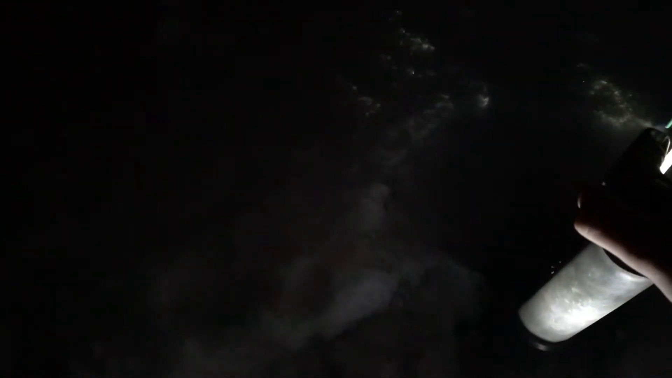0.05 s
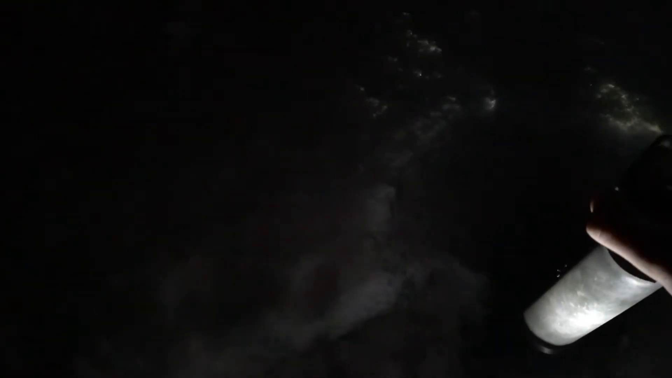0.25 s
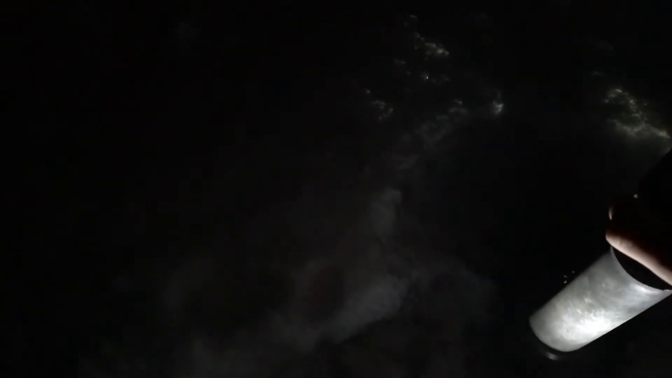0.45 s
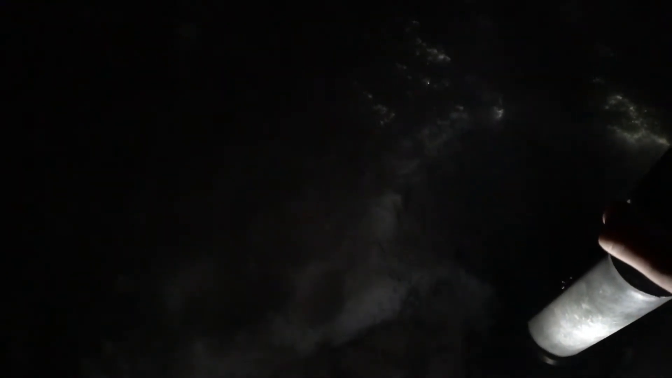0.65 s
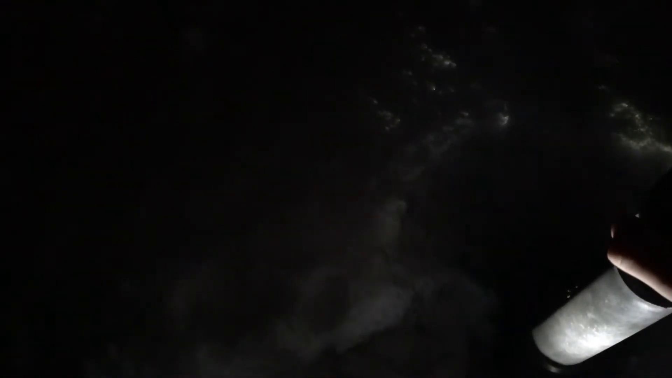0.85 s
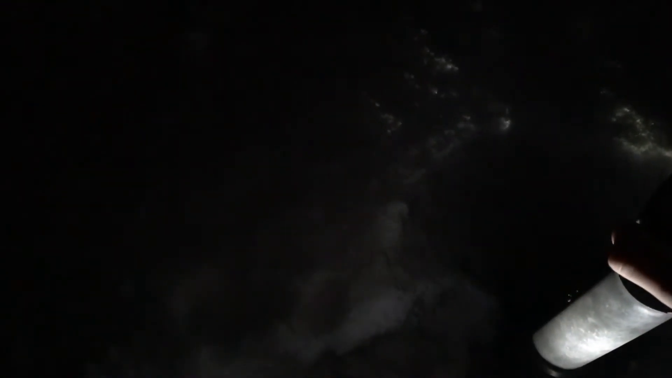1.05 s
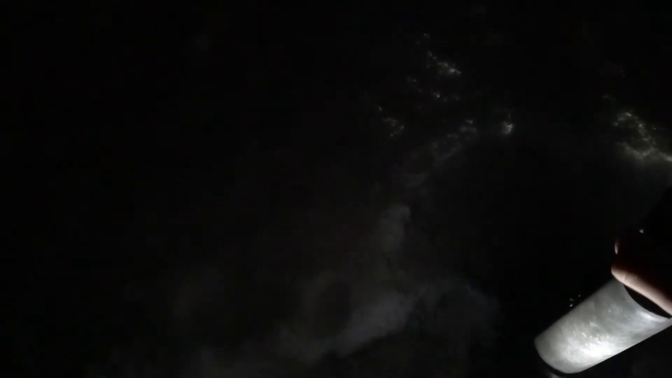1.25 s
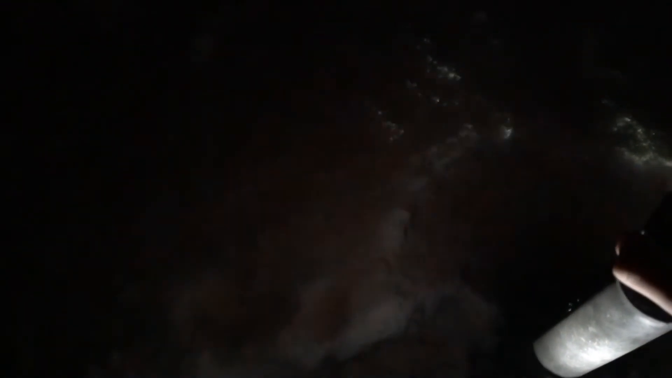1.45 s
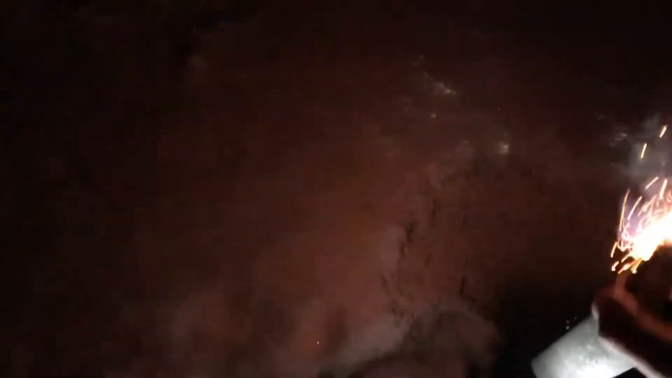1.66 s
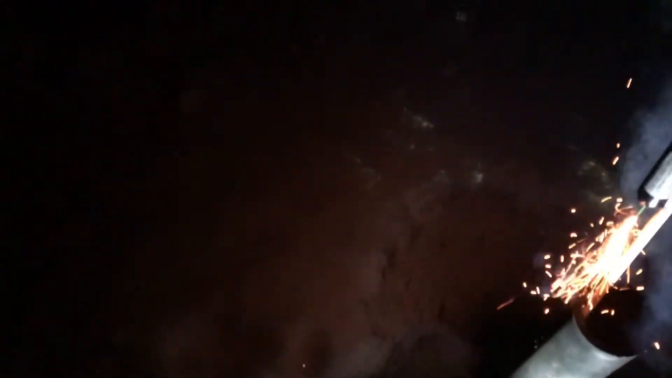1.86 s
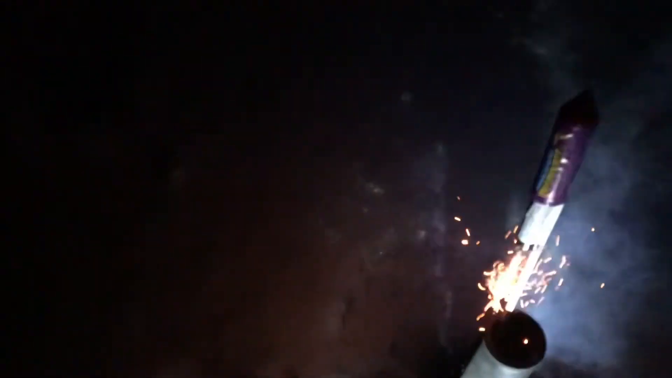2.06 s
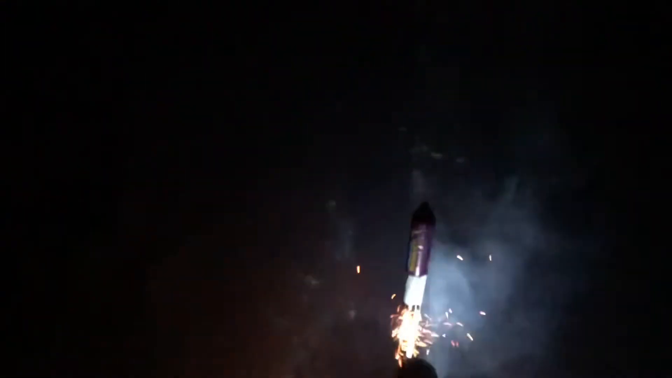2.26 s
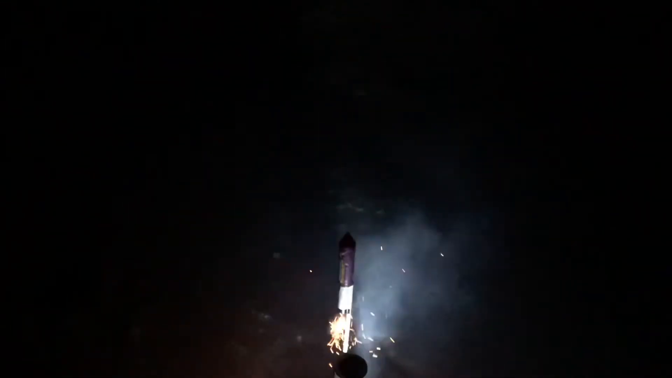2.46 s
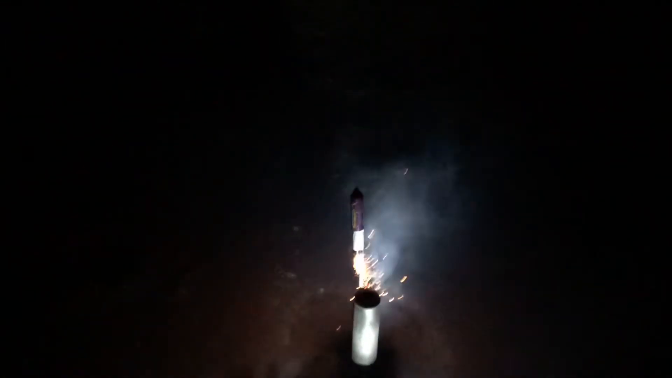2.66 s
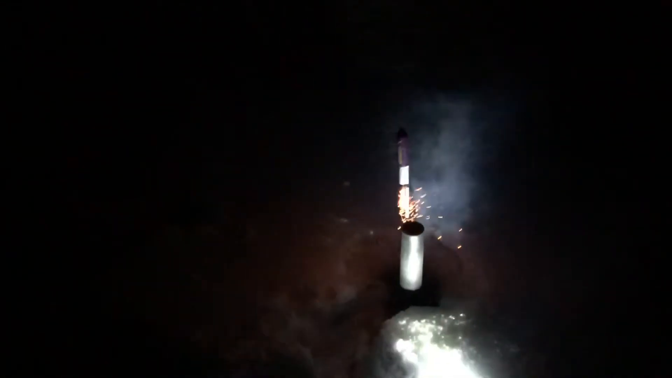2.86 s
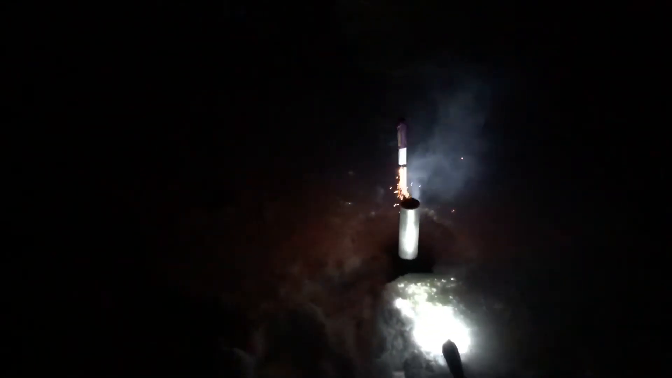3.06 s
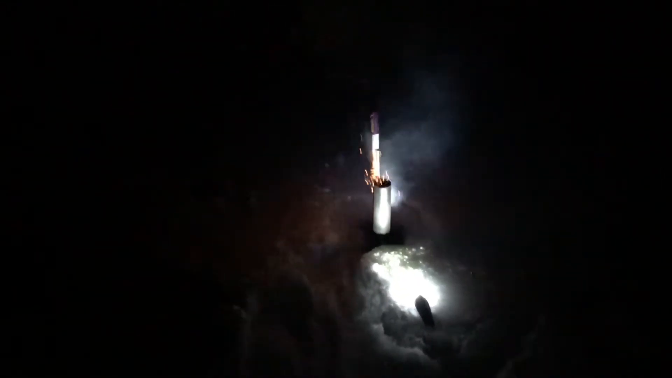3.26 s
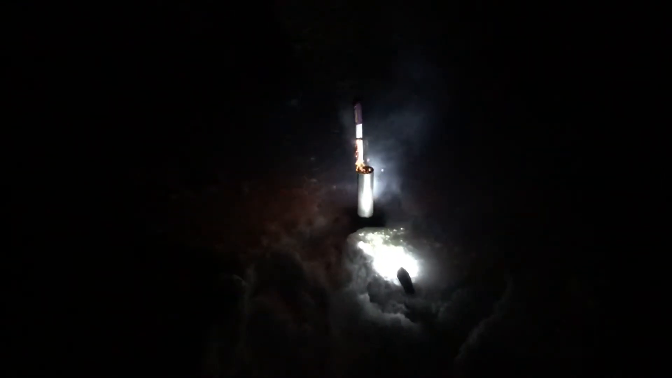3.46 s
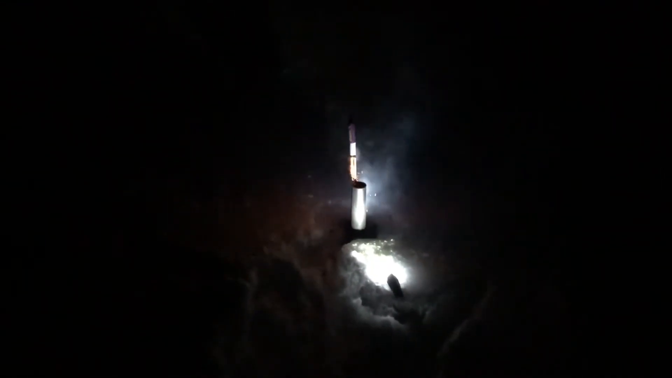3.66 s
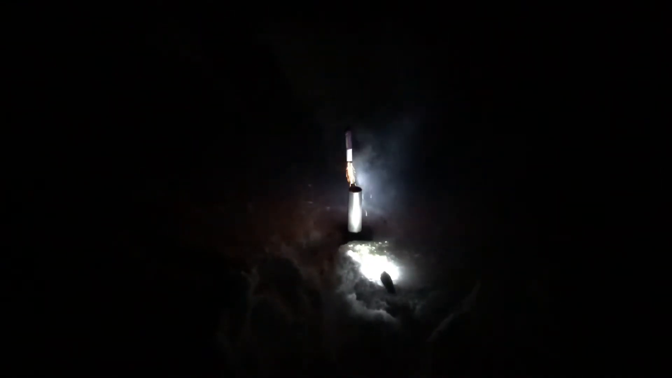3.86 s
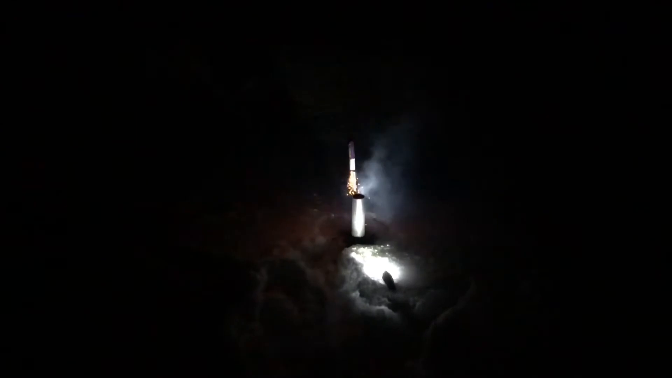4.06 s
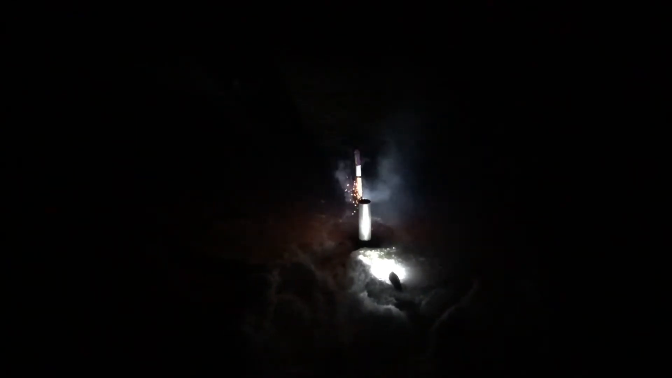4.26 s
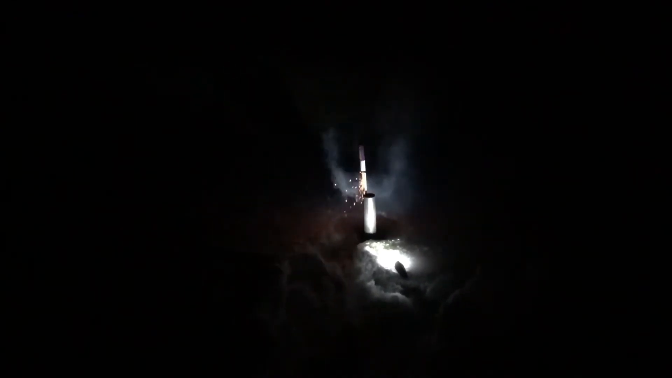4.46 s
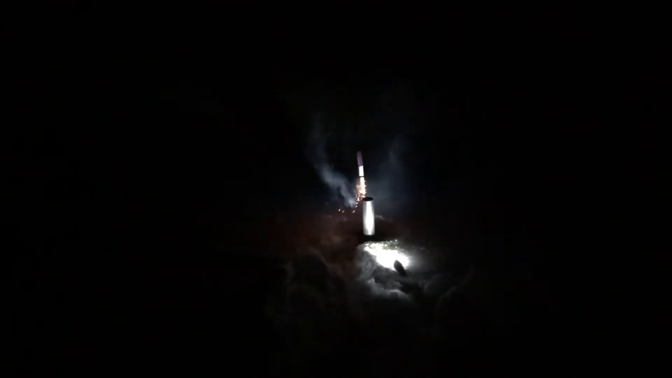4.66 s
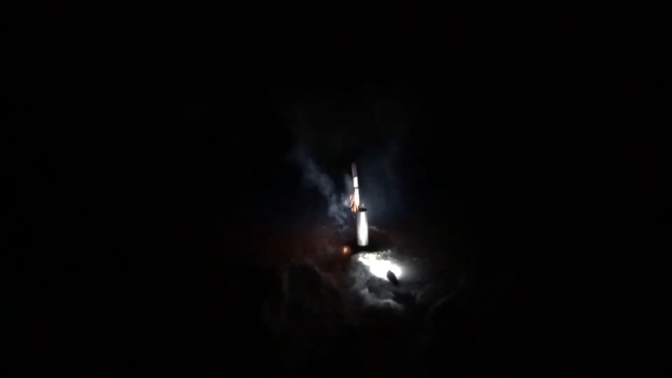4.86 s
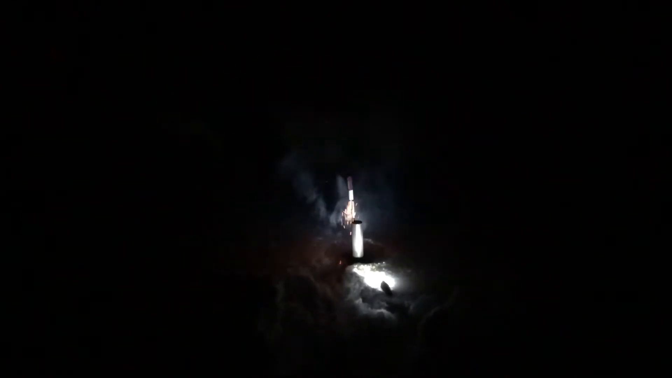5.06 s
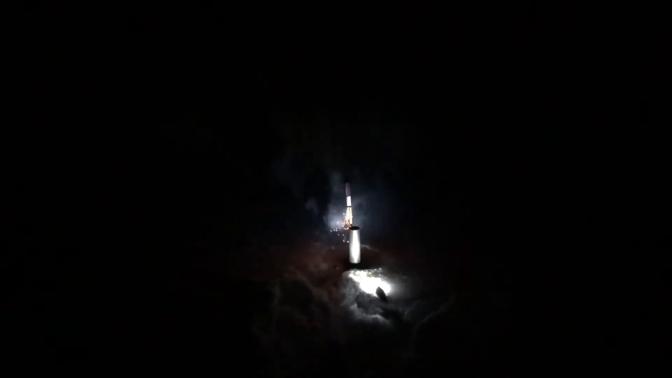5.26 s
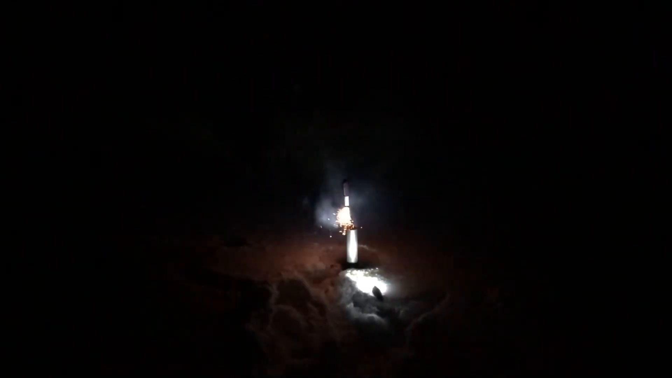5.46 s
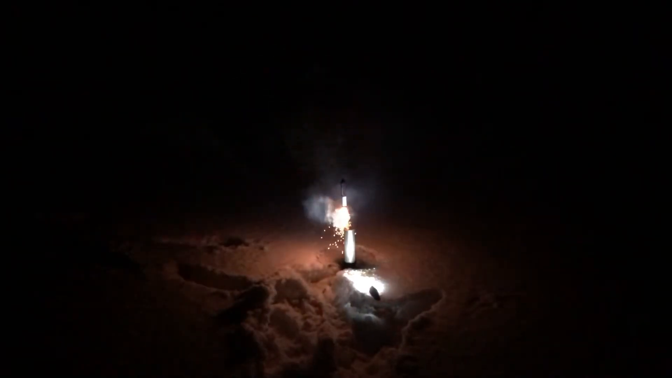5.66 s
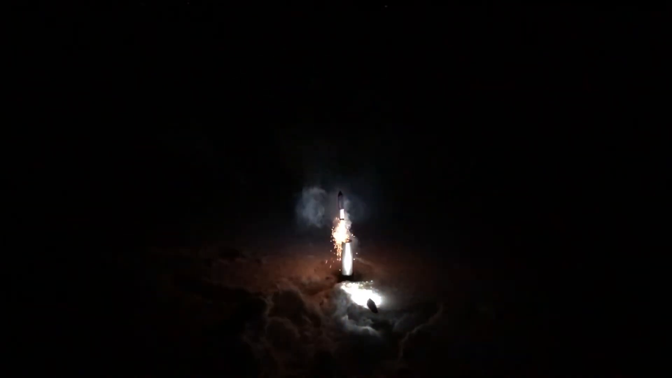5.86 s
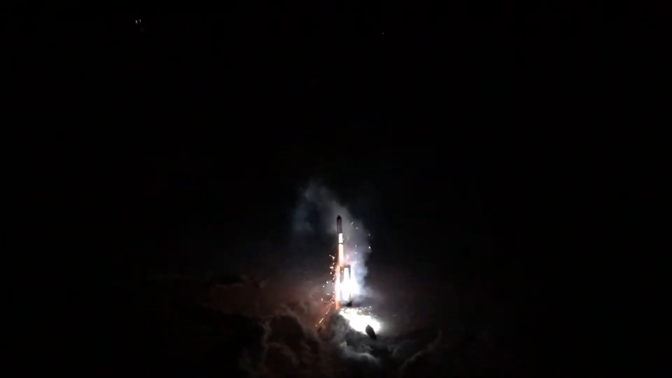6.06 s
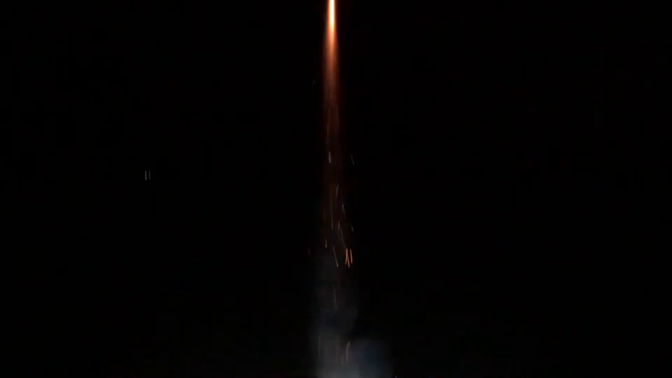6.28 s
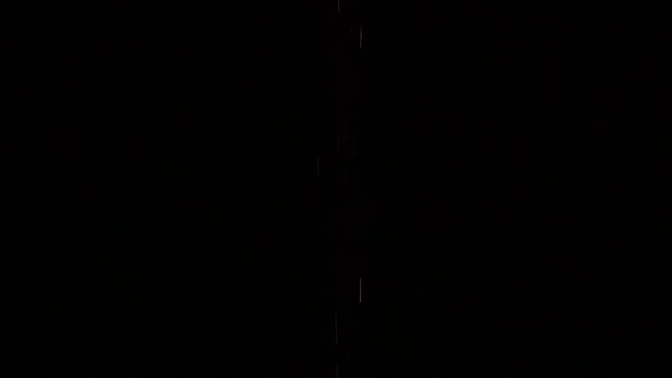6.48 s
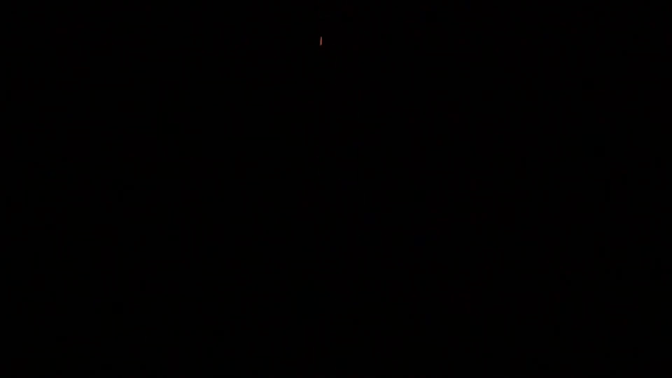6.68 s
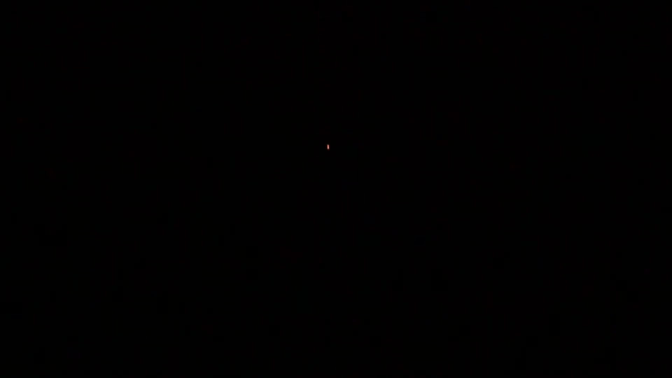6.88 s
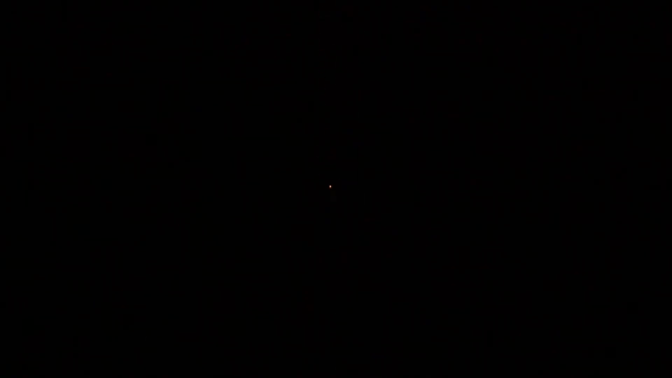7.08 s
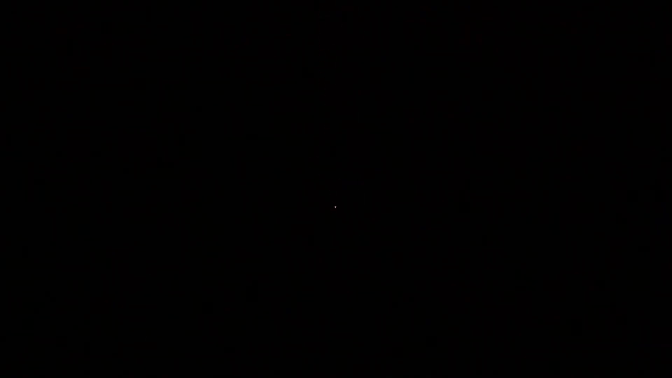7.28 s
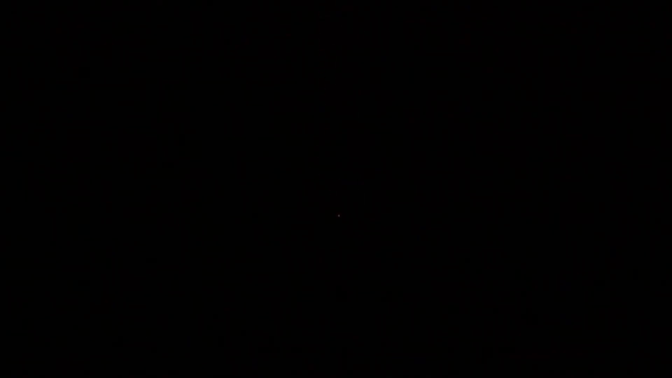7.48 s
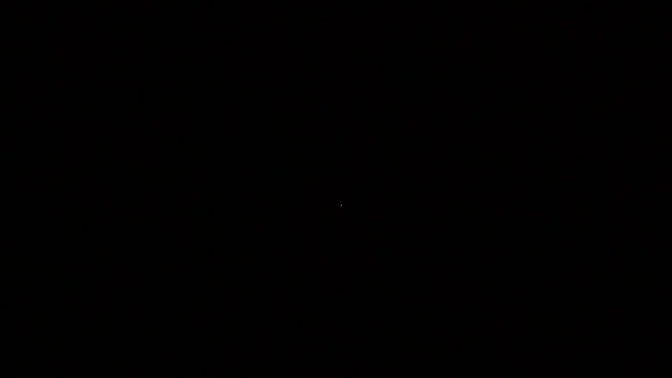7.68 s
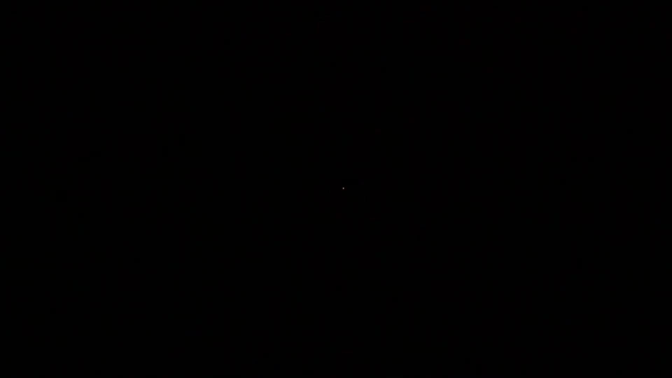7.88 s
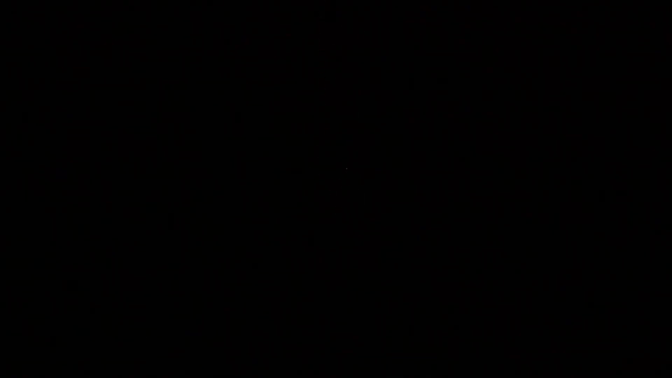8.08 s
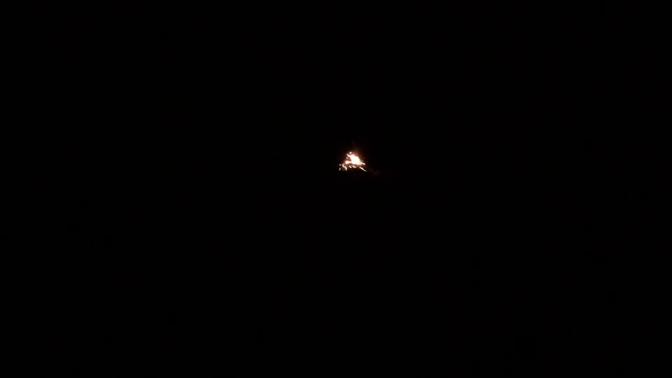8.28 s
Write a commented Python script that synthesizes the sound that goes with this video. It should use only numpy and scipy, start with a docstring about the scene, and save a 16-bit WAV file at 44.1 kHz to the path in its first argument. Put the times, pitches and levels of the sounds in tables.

```python
"""Rocket launch on a breezy night

A rocket's fuse is lit: its burning powder makes a hiss and a flame burr of coloured noise, fading with distance.
The hiss has a resonance that sinks as the rocket settles in its launch tube, then climbs as the fuse burns.
The motor swells as three bands of jet noise with two wavering tube notes, and its exhaust hits the microphone.
A dull far wash follows, then a dry burst of short shocks and ringing thumps, with a fainter echo.
Beneath lie night air, a low drone, breeze and gusts; short clicks, pops of powder and a knock stand out."""
import sys
import numpy as np
from scipy import signal
from scipy.fft import rfft, irfft, next_fast_len
from scipy.io import wavfile

SR = 44100
rng = np.random.default_rng(int(sys.argv[2]) if len(sys.argv) > 2 else 0)


def dump_mix(stems):
    """Bounce the given channels to the path in sys.argv[1] as a 16-bit WAV at rate SR."""
    frames = np.atleast_2d(stems).T  # one column per channel
    limited = np.clip(frames, -1, 1)  # hard clip at full scale
    pcm = np.round(limited * 32767).astype(np.int16)
    wavfile.write(sys.argv[1], SR, pcm)


N = 367353
TIME = np.arange(N) / SR

# frequencies [Hz] and times [s] of the short-time spectrum that colours noise
FRAME = 1024
FRAME_HZ, FRAME_S, _ = signal.stft(np.zeros(N), SR, nperseg=FRAME)
FRAME_HZ = np.maximum(FRAME_HZ, 1)[:, None]

# bands in which noise levels are set [Hz]
LOW_BAND, MID_BAND, RUSH_BAND = (40, 450), (550, 2200), (2500, 6500)
TOP_BAND, FAR_BAND = (7800, 15500), (3000, 15000)

# puffs of wind on the microphone, and the rocket's exhaust blast at 6.29 s:
# (time [s], level before trim [dB], relative length [s], eddy frequency before pacing [Hz])
GUSTS = [(0.535, -43.5, 0.019, 91), (0.649, -41, 0.041, 169.7), (0.658, -35, 0.05, 78),
         (1.177, -51.5, 0.12, 65), (1.68, -40, 0.0078, 253), (1.706, -45, 0.013, 262),
         (1.821, -37.5, 0.012, 237), (2.004, -33, 0.012, 310), (2.119, -43.5, 0.021, 123),
         (2.642, -34.5, 0.044, 120.2), (2.805, -37.5, 0.043, 82.9), (2.93, -34.5, 0.073, 135),
         (3.235, -39, 0.082, 130), (3.377, -42.5, 0.017, 113.3), (3.598, -40, 0.02, 162.7),
         (3.724, -46, 0.023, 77), (3.83, -44.5, 0.017, 139), (3.892, -41, 0.031, 106),
         (4.022, -46.5, 0.033, 69.9), (4.125, -43.5, 0.02, 101), (4.75, -46, 0.021, 160),
         (5.018, -45.5, 0.032, 135), (5.102, -43.5, 0.015, 160), (5.206, -47.5, 0.022, 170),
         (5.391, -41.5, 0.023, 85), (6.286, -14.5, 0.026, 210), (6.296, -26, 0.038, 62),
         (6.692, -46, 0.055, 171), (6.755, -39.5, 0.012, 95.2), (6.889, -41, 0.02, 148.3),
         (7.036, -45.5, 0.027, 82), (7.392, -47.5, 0.038, 109), (7.879, -47, 0.02, 99),
         (7.956, -44.5, 0.047, 120.4)]

# the fuse catches, flares, and at last the flame slips into the nozzle
CATCH_S, FLARE_S, NOZZLE_S = 1.424, 1.49, 5.62
# the rocket passes the microphone; afterwards the low background dips briefly
PASS_S = 6.29
LULL_S, LULL_DB, LULL_WIDTH_S = 6.54, -23, 0.07


def from_db(db):
    """Level is logarithmic: decibels to amplitude gain."""
    return 10 ** (np.asarray(db) / 20)


def rms_one(x):
    """Mean power sets the level: scale to unit rms."""
    return x / np.sqrt(np.mean(x ** 2) + 1e-20)


def in_time(rows, at=TIME):
    """Linear interpolation: each column of a curve table, joined by straight lines."""
    s, *columns = np.transpose(rows)
    return [np.interp(at, s, c) for c in columns]


def at_hz(points, hz=FRAME_HZ):
    """Logarithmic pitch scale: a spectrum in dB, interpolated over log frequency."""
    knots, db = np.transpose(points)
    return np.interp(np.log(hz), np.log(knots), db)


def during(start, end, fade):
    """Gating: one between two times, with linear ramps outside them."""
    return np.clip(np.minimum(TIME - start, end - TIME) / fade + 1, 0, 1)


def ramp(start, end, at=TIME):
    """Linear growth: nearly zero before the start, one after the end."""
    return np.clip((at - start) / max(end - start, 1e-3), 1e-4, 1)


def bell(centre, width, at=TIME):
    """Gaussian swell in time, one at its centre."""
    return np.exp(-.5 * ((at - centre) / width) ** 2)


def hump(hz, octaves):
    """Gaussian resonance on the log-frequency axis, one at its centre."""
    return np.exp(-.5 * (np.log2(FRAME_HZ / hz) / octaves) ** 2)


def drift(rate):
    """Slow random modulation of unit rms, changing about rate times a second."""
    knots = rng.standard_normal(N // 16)
    return rms_one(np.interp(TIME * 2 * rate, np.arange(len(knots)), knots))


def reflection_db(lag_ms, share):
    """Interference: the comb colour of a sound joined by its own delayed reflection."""
    delayed = np.exp(-2j * np.pi * FRAME_HZ * lag_ms / 1000)
    return 20 * np.log10(abs(1 + np.clip(share, 0, .9) * delayed))


def phasing_db():
    """Interference: weak reflections slide as source and listener move by tube and rough ground."""
    slide = 1 + .04 * np.interp(FRAME_S, TIME, drift(1))
    lags_ms = rng.uniform(.9, 3.5, size=4)
    return sum(reflection_db(lag_ms * slide, .075) for lag_ms in lags_ms)


def turbulence(colour_db, band):
    """Turbulent noise of a fixed or moving colour, with unit rms expected inside the band (Hz)."""
    gain = from_db(colour_db)
    inside = (FRAME_HZ > band[0]) & (FRAME_HZ < band[1])
    gain = gain / np.sqrt(np.mean(gain ** 2 * inside, axis=0))
    white = signal.stft(rng.standard_normal(N), nperseg=FRAME)[2]
    return signal.istft(white * gain)[1][:N]


def lowpass(x, hz, order=1):
    """Low-pass filtering (Butterworth): the treble is weakened above a corner frequency."""
    return signal.sosfilt(signal.butter(order, hz, fs=SR, output="sos"), x)


def clicks_at(times, db):
    """Impulse excitation: single-sample pushes of given sizes."""
    out = np.zeros(N)
    out[np.round(np.asarray(times) * SR).astype(int)] = from_db(db)
    return out


def dying(clicks, t60):
    """Exponential decay: an envelope falling 60 dB in t60 seconds after each click."""
    return signal.lfilter([1], [1, -from_db(-60 / (t60 * SR))], clicks + 1e-18)


def ring(clicks, hz, t60):
    """Damped resonance: a click sets a decaying sine ringing."""
    r, w = from_db(-60 / (t60 * SR)), 2 * np.pi * hz / SR
    return signal.lfilter([0, np.sin(w)], [1, -2 * r * np.cos(w), r * r], clicks + 1e-18)


def night():
    """Broadband ambience: steady open air and a low drone like far traffic."""
    # colour of the open air: (frequency [Hz], relative level [dB])
    air_colour = [(15, -30), (40, 2.5), (65, -5), (85, -10), (115, -16), (220, -21), (310, -13.5),
                  (450, -21.5), (850, -19.5), (1100, -27), (1700, -36.5), (4000, -40.5), (15500, -47)]
    # colour of the drone: (frequency [Hz], relative level [dB])
    drone_colour = [(70, -27), (150, 0.5), (225, 2), (290, -4), (345, -0.5), (440, -13), (700, -23.5),
                    (2000, -66)]
    # level of the drone outside the lull: (time [s], level [dB])
    drone_level = [(0, -67.5), (2.25, -76), (2.55, -58), (5.1, -57.5), (5.8, -62), (7.3, -58.5),
                   (8.33, -59)]
    air = from_db(-69.5) * turbulence(at_hz(air_colour), MID_BAND)
    drone_db = in_time(drone_level)[0] + LULL_DB * bell(LULL_S, LULL_WIDTH_S)
    return air + from_db(drone_db) * turbulence(at_hz(drone_colour), LOW_BAND)


def breeze(breeze_db=-69, stirred_db=-61.5, stirred_s=0.1, lumps_db=5.5):
    """Flow noise by turbulent pressure: lumpy throughout, and stirred around each puff or blast."""
    # (frequency [Hz], relative level [dB])
    breeze_colour = [(15, -31.5), (40, 0), (65, 1.5), (120, -7.5), (220, -7.5), (340, -12), (500, -30),
                     (1000, -46), (3000, -78.5)]
    stirred = sum(bell(s, stirred_s) for s, *_ in GUSTS)
    strength = np.sqrt(from_db(breeze_db) ** 2 + from_db(stirred_db) ** 2 * stirred)   # powers add
    unsteady_db = lumps_db * drift(10) + LULL_DB * bell(LULL_S, LULL_WIDTH_S)
    return strength * from_db(unsteady_db) * turbulence(at_hz(breeze_colour), LOW_BAND)


def gusts_and_blast(level_db=-2.3, width=0.47, spread=.45, big_eddy_db=-8, small_eddy_db=-13):
    """Eddy convection: in wind puffs and the exhaust blast, uneven eddies of three sizes pass the port."""
    out = np.zeros(N)
    pace = np.exp(np.clip(spread, 0, 1) * drift(200))
    travel = np.cumsum(pace / pace.mean()) / SR
    for (s, db, length, hz), start in zip(GUSTS, rng.random(len(GUSTS))):
        near = slice(max(int((s - .2) * SR), 0), int((s + .2) * SR))
        swell = bell(s, width * length, TIME[near])
        phase = 2 * np.pi * (hz * travel[near] + start)
        eddies = np.sin(phase)
        eddies += from_db(big_eddy_db) * np.sin(0.35 * phase)
        eddies += from_db(small_eddy_db) * np.sin(2.15 * phase)
        out[near] += from_db(db + level_db) * swell * np.sqrt(2) * eddies
    return lowpass(out * from_db(2 * drift(99)), 494, order=4)


def exhaust_wash(peak_db=-27.5, rise_db_per_s=170.5, fall_db_per_s=196):
    """Flow noise: the exhaust buffets the microphone as the rocket passes."""
    # (frequency [Hz], relative level [dB])
    wash_colour = [(15, -21.5), (45, -9), (70, -3.5), (110, -5.5), (200, 0.5), (300, -3.5), (520, 7.5),
                   (700, -10.5), (1500, -41)]
    below_peak_db = np.maximum(rise_db_per_s * (PASS_S - TIME), fall_db_per_s * (TIME - PASS_S))
    return from_db(peak_db - below_peak_db) * turbulence(at_hz(wash_colour), LOW_BAND)


def click_and_knock():
    """Modal ringing: the sharp click of a powder spit, then a knock, excite damped modes."""
    # the spit's click at 1.69 s, then the knock at 2.51 s: (time [s], push [dB])
    impulses = [(1.6914, -24.5), (2.5101, -27.5), (2.515, -37)]
    # their ring: (frequency [Hz], level relative to the push [dB], decay by 60 dB [s])
    modes = [(336, -8, 0.048), (920, -12, .015), (1500, -11, .012), (3300, -10, 0.0057), (7000, -14, .003)]
    pushes = clicks_at(*np.transpose(impulses))
    return sum(from_db(db) * ring(pushes, hz, t60) for hz, db, t60 in modes)


def clicks_and_pops(level_db=-6, bright_hz=7000):
    """Impulsive noise: short noisy clicks before the fuse catches, then pops of powder, decay quickly."""
    # (time [s], level before trim [dB], decay by 60 dB [s])
    pops = [(.3188, -63, .01), (.59, -62, .03), (0.7232, -56, .02), (.7503, -60, .02), (1.4227, -46, 0.012),
            (1.4397, -44, .02), (1.69, -19, 0.0082), (1.78, -36, .01), (2.507, -40, 0.022),
            (4.3214, -47, .006)]
    crackle = rms_one(np.tanh(lowpass(rng.standard_normal(N), bright_hz) * 2))
    return from_db(level_db) * crackle * sum(dying(clicks_at(s, db), t60) for s, db, t60 in pops)


def sparks(per_s=140, size_db=-7, spread_db=2.0, t60=0.0063):
    """Random (Poisson-like) arrivals: tiny grains briefly lift the hiss; mean power one."""
    sizes = from_db(size_db + spread_db * np.minimum(rng.exponential(1, N), 4))
    return rms_one(1 + dying(sizes * (rng.random(N) < per_s / SR), t60))


def fuse_levels():
    """Distance law: gains of hiss and flame as the fuse catches, flares, surges and is left behind."""
    # surges and falters of the burning fuse; the last is the motor's ignition puff:
    # (time [s], hiss change [dB], flame change [dB], bell width [s])
    surges = [(1.985, -3, 0.5, 0.018), (2.153, -1.5, -2, 0.021), (4.93, 1, 4.5, 0.12),
              (5.207, -2.5, -1, 0.22), (5.543, -3, 5.5, 0.093), (5.894, -4, 6, 0.028)]
    retreat_s, start_m, retreat_m_per_s = 2.035, 0.29, 0.9
    doublings = np.log2(1 + retreat_m_per_s * np.maximum(TIME - retreat_s, 0) / start_m)
    # the flame's burr fades less per doubling of distance than the beamed hiss
    hiss_db = -38.5 - 7 * doublings
    flame_db = -49 - 3.5 * doublings
    flame_db -= 2.5 * ramp(NOZZLE_S, NOZZLE_S + .03)   # muffled in the nozzle
    for s, hiss_surge_db, flame_surge_db, width in surges:
        swell = bell(s, width)
        hiss_db = hiss_db + hiss_surge_db * swell
        flame_db = flame_db + flame_surge_db * swell
    # a short fizz at the catch, falling at 107 dB per second
    catch = from_db(-58 - 107 * np.maximum(TIME - CATCH_S, 0))
    hiss_rise_s, flame_rise_s, flare_power = 0.33, 0.15, 1.25
    hiss = ramp(FLARE_S, FLARE_S + hiss_rise_s) ** flare_power * from_db(hiss_db)
    flame = ramp(FLARE_S, FLARE_S + flame_rise_s) ** flare_power * from_db(flame_db)
    return hiss + catch, flame + from_db(-4) * catch


def sleeve_depths():
    """Resonator coupling: dB of the sleeve's peak and of the dips above and below, as the flame moves in."""
    enter_s, deep_s = 3.85, 5.05
    mouth_s, mouth_width_s, dip_full_s = 3.2, 0.42, 3.74
    depth = ramp(enter_s, deep_s, FRAME_S)
    muffled = ramp(NOZZLE_S, NOZZLE_S + 0.026, FRAME_S)
    open_lift_db, deep_lift_db = 2.5, 13
    lift_db = open_lift_db + (deep_lift_db - open_lift_db) * depth - 2.5 * muffled
    dip_db = 8.5 * ramp(mouth_s, dip_full_s, FRAME_S) * (1 - muffled)
    # a notch while the flame nears the mouth, then a slight lift when it is deep
    under_db = 15 * bell(mouth_s, mouth_width_s, FRAME_S) - 3 * depth * (1 - muffled)
    return lift_db, dip_db, under_db


def fuse(flutter_db=1.13, sputter_db=0.55, heave_db=0.5, ring_octaves=0.42, dip_ratio=1.92,
         dip_octaves=0.29, under_ratio=0.77, under_octaves=0.11, crest_db=1.5, crest_octaves=0.061):
    """Air-column resonance: unevenly burning powder hisses through a sleeve, over the flame's burr."""
    # resonance, sinking as the rocket settles in the tube, then climbing as the fuse burns:
    # (time [s], resonance [Hz])
    sleeve_pitch = [(1.42, 3440), (2.2, 3370), (2.45, 2880), (3.35, 2980), (4.5, 3950), (5.38, 4420),
                    (5.44, 5270), (5.86, 5399)]
    # reflections in and around the sleeve: (lag [periods of its resonance], share [1])
    sleeve_echoes = [(1.0, .08), (2.75, .13), (5.1, .12)]
    # colour of the hiss before the sleeve: (frequency [Hz], relative level [dB])
    hiss_colour = [(400, -36), (1000, -8), (2200, 0.5), (4000, -.5), (6800, 0.5), (8200, 1.5),
                   (12500, -0.5), (15500, -1)]
    # colour of the burr: (frequency [Hz], relative level [dB])
    flame_colour = [(200, -5), (500, -1), (750, -2.5), (1300, 0), (1750, -1), (2300, -4), (3000, -4),
                    (6000, -15.5)]
    hz, = in_time(sleeve_pitch, FRAME_S)
    lift_db, dip_db, under_db = sleeve_depths()
    hiss_gain, flame_gain = fuse_levels()
    sleeve = lift_db * hump(hz, ring_octaves) + crest_db * hump(hz, crest_octaves)
    # antiresonances flank the peak
    sleeve = sleeve - dip_db * hump(hz * dip_ratio, dip_octaves)
    sleeve = sleeve - under_db * hump(hz * under_ratio, under_octaves)
    ripples = sum(reflection_db(1000 * periods / hz, share) for periods, share in sleeve_echoes)
    hiss = turbulence(at_hz(hiss_colour) + sleeve + ripples + phasing_db(), TOP_BAND)
    flame = turbulence(at_hz(flame_colour), MID_BAND)
    uneven_db = heave_db * drift(7) + flutter_db * drift(25) + sputter_db * drift(300)
    burn = from_db(uneven_db) * during(CATCH_S, 5.98, fade=.002)
    return burn * (hiss * sparks() * hiss_gain + flame * flame_gain)


def far_rocket(hiss_trim_db=0.0, rumble_trim_db=-0.3):
    """Propagation loss and echo: distance and the land turn the jet into a dull, lingering wash."""
    # climbing rocket and its echo from the land, before trims: (time [s], hiss [dB], rumble [dB])
    far_levels = [(6.54, -58.5, -65), (6.57, -57, -66), (6.77, -62, -66), (6.914, -63, -62.5),
                  (7.15, -56.5, -60.5), (7.288, -61, -58), (7.654, -59.5, -57.5), (7.752, -65, -58),
                  (8.14, -64, -62)]
    # colour of the hiss: (frequency [Hz], relative level [dB])
    hiss_colour = [(800, -3.5), (2500, 0.5), (4500, 2.5), (7000, -2.5), (9500, -2.5), (12500, -7.5),
                   (15500, -8)]
    # colour of the rumble: (frequency [Hz], relative level [dB])
    rumble_colour = [(200, -31), (500, -2.5), (1100, 2.5), (1700, 0), (2600, -10), (5000, -25)]
    hiss_db, rumble_db = in_time(far_levels)
    hiss = from_db(hiss_db + hiss_trim_db) * turbulence(at_hz(hiss_colour), FAR_BAND)
    rumble = from_db(rumble_db + rumble_trim_db) * turbulence(at_hz(rumble_colour), MID_BAND)
    return (hiss + rumble) * during(6.53, N / SR, fade=0.13)


def burst(shock_hz=1500, shock_t60=0.0013, snap_db=-3, snap_t60=0.0011,
          crack_db=-16, crack_t60=0.011, tail_db=-27, tail_t60=0.16):
    """Blast wave: a steep shock with a short thump behind it, then faint scatter from the ground."""
    # the burst and its echo: (time [s], shock push [dB], thump push [dB])
    blasts = [(8.177, -22.5, -25), (8.2178, -34, -43)]
    # ring of the thump: (frequency [Hz], level relative to the push [dB], decay by 60 dB [s])
    thump_modes = [(182, -5, 0.027), (474, 1.5, 0.0091), (814, -32, 0.0066)]
    s, shock_db, thump_db = np.transpose(blasts)
    shock = clicks_at(s, shock_db)
    push = clicks_at(s + 0.00041, thump_db)
    thump = sum(from_db(db) * ring(push, hz, t60) for hz, db, t60 in thump_modes)
    front = -2 * ring(shock, shock_hz, shock_t60)
    snap = from_db(snap_db) * dying(shock, snap_t60) * rng.choice([-1, 1], N)
    scatter = from_db(crack_db) * dying(shock, crack_t60) + from_db(tail_db) * dying(shock, tail_t60)
    return thump + front + snap + scatter * rms_one(lowpass(rng.standard_normal(N), 4500))


def edge_tone(rows, wobble, waver_db):
    """Edge-tone excitation: an air jet sounds an unsteady note on a resonance of the tube."""
    hz, db = in_time(rows)
    phase = 2 * np.pi * np.cumsum(hz * (1 + wobble * drift(60))) / SR
    gain = from_db(db + waver_db * drift(40)) * during(rows[0][0], rows[-1][0], fade=.02)
    return np.sqrt(2) * np.sin(phase) * gain


def jet_db(full_db, power, turn_db, fade_db_per_s):
    """Power law of jet noise: level follows pressure, then falls on leaving, turning and burnout."""
    ignite_s, build_s = 5.708, 0.45
    leave_s, turn_s = 6.3575, 0.01
    burnout_s, burnout_db_per_s = 6.445, 555
    build_db = power * 20 * np.log10(ramp(ignite_s, ignite_s + build_s))
    # the beam turns away while the rocket recedes
    away_db = turn_db * ramp(leave_s, leave_s + turn_s)
    away_db += fade_db_per_s * np.maximum(TIME - leave_s, 0)
    return full_db + build_db - away_db - burnout_db_per_s * np.maximum(TIME - burnout_s, 0)


def motor(rush_edge=1.24, edge_db=-22, flutter_db=0.7, pass_dip_db=-4, pass_dip_s=0.02):
    """Jet mixing noise: hiss, rush and roar, combed by a moving ground reflection, over the tube's notes."""
    # centre of the rush, sinking overall as the rocket speeds away: (time [s], centre [Hz])
    rush_pitch = [(5.84, 5154), (5.95, 4470), (6.1, 4860), (6.22, 4480), (6.33, 4100), (6.42, 3660),
                  (6.5, 3020)]
    # lag of the ground reflection, long once the nozzle has lifted: (time [s], lag [ms])
    ground_lag = [(5.84, 0.83), (6.1, 0.74), (6.25, 1.1), (6.35, 2.4), (6.5, 7.8)]
    # the jet blows across the launch tube: (time [s], mean pitch [Hz], level before waver [dB])
    hoot_notes = [(5.97, 835, -71), (6.02, 830, -37.5), (6.07, 864, -38.5), (6.125, 866, -28),
                  (6.17, 844, -40), (6.22, 870, -55)]
    # the tube's lower note: (time [s], mean pitch [Hz], level before waver [dB])
    hum_notes = [(5.97, 300, -66), (6.02, 310.6, -47.5), (6.11, 312, -48.5), (6.17, 336, -37),
                 (6.22, 377, -36.5), (6.26, 375, -49)]
    # colour of the hiss: (frequency [Hz], relative level [dB])
    hiss_colour = [(1500, -20), (4000, -2.5), (7000, 2), (9000, 3), (11500, 3), (13000, 2), (15500, 1)]
    # colour of the roar: (frequency [Hz], relative level [dB])
    roar_colour = [(100, -23), (400, -9), (700, -1.5), (1200, 2.5), (2000, 1), (3000, -5), (6000, -14)]
    hiss_db = jet_db(full_db=-17, power=5, turn_db=6.5, fade_db_per_s=100)
    rush_db = jet_db(full_db=-17, power=4, turn_db=1, fade_db_per_s=121.5)
    roar_db = jet_db(full_db=-22, power=5.5, turn_db=3.5, fade_db_per_s=94)
    rush_db = rush_db + pass_dip_db * bell(PASS_S, pass_dip_s)   # the rush dips briefly at the pass
    ground = reflection_db(in_time(ground_lag, FRAME_S)[0], share=0.14) + phasing_db()
    # (multiple of the centre [1], relative level [dB])
    rush_shape = [(.05, -40), (.3, -14), (.6, -4), (1, 0),
                  (rush_edge, -2), (rush_edge * 1.28, edge_db), (4, -35)]
    rush_colour = at_hz(rush_shape, FRAME_HZ / in_time(rush_pitch, FRAME_S)[0])
    hiss = from_db(hiss_db) * turbulence(at_hz(hiss_colour) + ground, TOP_BAND)
    rush = from_db(rush_db) * turbulence(rush_colour + ground, RUSH_BAND)
    roar = from_db(roar_db) * turbulence(at_hz(roar_colour) + ground, MID_BAND)
    flutter = from_db(flutter_db * drift(70))
    jet = (hiss + rush + roar) * flutter * during(5.84, 6.51, fade=0.065)
    hoot = edge_tone(hoot_notes, wobble=.008, waver_db=1.5)
    hum = edge_tone(hum_notes, wobble=.05, waver_db=3)
    return jet + hoot + hum


def scene():
    """Superposition: all sources add at one microphone, the same in both channels."""
    air = night() + breeze() + gusts_and_blast() + exhaust_wash()
    burning = click_and_knock() + clicks_and_pops() + fuse()
    mono = air + burning + far_rocket() + burst() + motor()
    return np.stack([mono, mono])


def record(dry, top=1.0, hand_lag_ms=0.711, hand_share=0.03, low_cut_hz=35, high_cut_hz=15800):
    """Transducer response: hand reflection and port colour the sound, peaks saturate, extremes are cut."""
    # (frequency [Hz], response [dB])
    microphone = [(1000, -0.5), (5400, -1), (6100, -.5), (6900, 0), (7600, -2.5), (8300, -1.5), (9700, -1),
                  (10450, -5), (11200, -1.5), (12100, 0), (12700, 1), (13500, -1), (15000, -1)]
    size = next_fast_len(N)
    hz = np.maximum(np.arange(size // 2 + 1) * SR / size, 1)
    hand = 1 + hand_share * np.exp(-2j * np.pi * hz * hand_lag_ms / 1000)
    response = hand * from_db(at_hz(microphone, hz))
    coloured = irfft(rfft(dry, size) * response, size)[:, :N]
    low_cut = signal.butter(3, low_cut_hz, "high", fs=SR, output="sos")
    coloured = signal.sosfilt(low_cut, coloured)
    rounded = top * np.tanh(coloured / top)
    steep = signal.ellip(12, .1, 90, high_cut_hz, fs=SR, output="sos")
    return signal.sosfilt(steep, rounded)


dry = scene()
out = record(dry)
dump_mix(out)
```